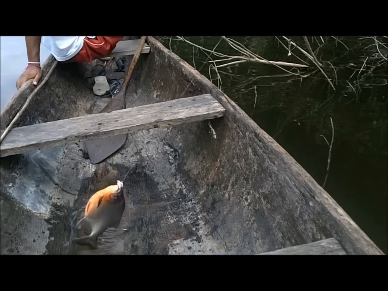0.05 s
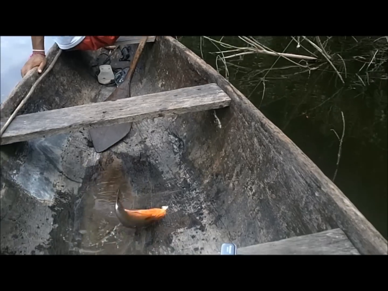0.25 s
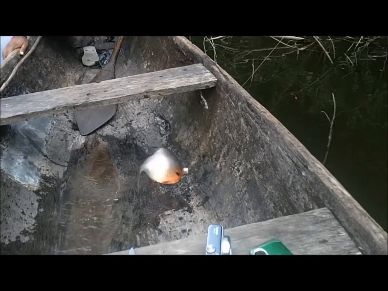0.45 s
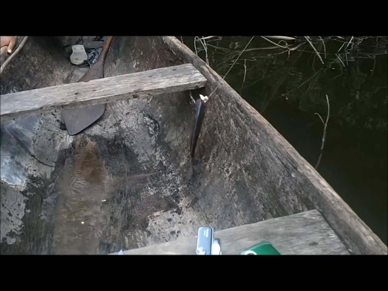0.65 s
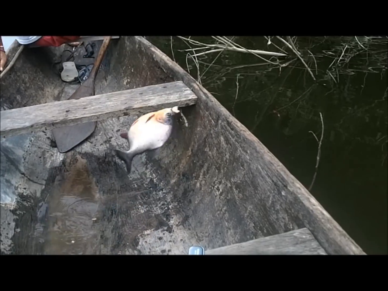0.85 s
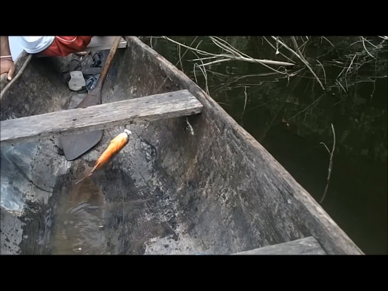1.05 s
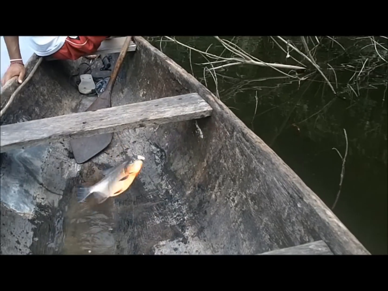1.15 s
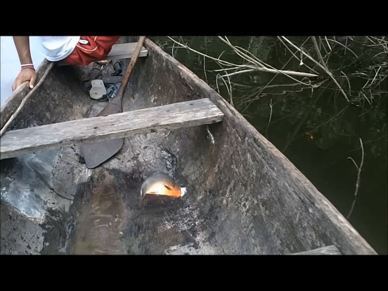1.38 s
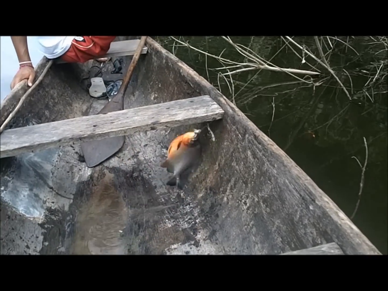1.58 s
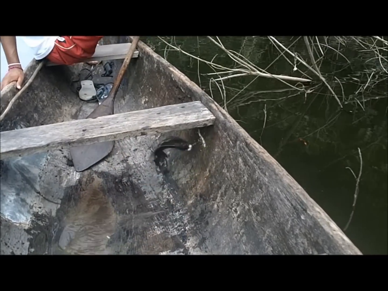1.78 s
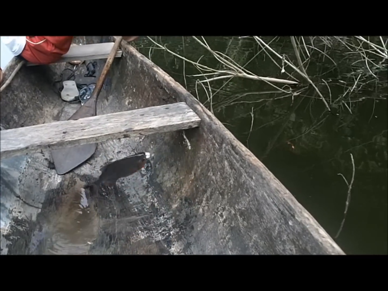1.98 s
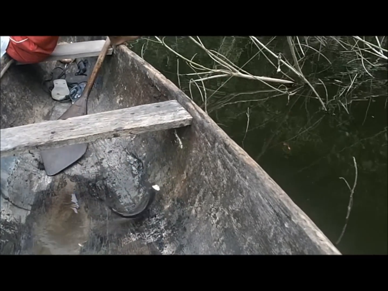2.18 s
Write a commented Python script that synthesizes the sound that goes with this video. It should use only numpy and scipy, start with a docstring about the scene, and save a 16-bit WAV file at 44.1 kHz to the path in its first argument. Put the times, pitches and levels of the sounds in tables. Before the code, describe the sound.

A fish thrashes in a wooden dugout. Quiet river air with faint insects and fast ticking, light touches from 0.2 s, then sharp wet slaps and plank knocks at about 0.5 s and again at 0.8-0.9 s, with low hull thuds. After a lull, a hard flurry hits near 1.45 s, followed by wet slithering and weaker knocks around 1.8-1.9 s, fading to faint scrapes by 2.2 s. Short hull echo.

```python
"""A caught fish thrashes in a wooden dugout canoe, in forest-river air with insect tones and a faint fast ticking.
From 0.2 s light contacts, then a volley to 0.9 s: noise bursts through resonances smack wet and knock the planks.
Damped sine modes boom under it as weight lands on the hull; a pause, then a second volley from 1.4 s.
From 1.5 s coloured noise slithers over the wet floor between the last slaps; a short hull echo follows the fish.
The microphone housing cuts deep notches into all of it."""
import sys
import numpy as np
from scipy import signal
from scipy.fft import rfft, irfft, next_fast_len
from scipy.io import wavfile
from scipy.ndimage import map_coordinates

SR = 44100
rng = np.random.default_rng(int(sys.argv[2]) if len(sys.argv) > 2 else 0)


def wav_out(sig):
    """Save sig, one row per channel (or a flat mono array), as 16-bit PCM at SR to the path in sys.argv[1]."""
    wavfile.write(sys.argv[1], SR, np.round(np.clip(np.atleast_2d(sig).T, -1, 1) * 32767).astype(np.int16))


N = 98166


def amp(db):
    """Amplitude factor of a level in dB."""
    return 10 ** (np.asarray(db) / 20)


def unit(x):
    """x scaled to rms 1."""
    return x / np.sqrt(np.mean(x ** 2) + 1e-20)


def curves(rows):
    """Columns after t/s, interpolated to one value per sample."""
    s, *cols = np.transpose(rows)
    return [np.interp(np.arange(N) / SR, s, c) for c in cols]


def wobble(rate_hz):
    """Smooth random curve: spline through rate_hz normal draws per second."""
    points = rng.standard_normal(int(N * rate_hz / SR) + 4)
    return map_coordinates(points, [np.arange(N) * rate_hz / SR])


def filtered(x, response):
    """x times a response of frequency, by FFT."""
    m = next_fast_len(len(x) + 8192)
    return irfft(rfft(x, m) * response(np.fft.rfftfreq(m, 1 / SR)), m)[:len(x)]


def colour(points):
    """Gain through (f/Hz, level/dB) points on a log frequency axis; -120 dB outside."""
    f, db = np.transpose(points)
    return lambda hz: amp(np.interp(np.log(hz + 1), np.log(f + 1), db, -120, -120))


def peak(centre_hz, width_hz):
    """Band-pass response of one resonance, gain 1 at its centre."""
    return lambda f: 1j * f * width_hz / (centre_hz ** 2 - f * f + 1j * f * width_hz)


def noise(response, count=N):
    """Coloured noise of rms 1."""
    return unit(filtered(rng.standard_normal(count), response))


# Tail and body contacts: t/s, wet level/dB before SLAP_TRIM_DB, knock level/dB re wet,
# knock f/Hz, knock width/Hz, rise constant/s, t60/s
CONTACTS = [(.226, -63, 2, 1770, 1186, .002, 0.03), (.268, -53, 2, 1640, 504, 0.0032, 0.031),
            (0.2808, -40.5, -6, 1610, 505, 0.0014, 0.022), (0.3842, -63, 8, 6300, 1500, 0.00081, 0.017),
            (0.425, -56.5, 11.5, 3000, 250, 0.0006, 0.026), (0.4678, -38, -3, 1160, 614, 0.00091, 0.022),
            (0.4735, -34.5, -3.5, 2020, 700, 0.00043, 0.058),
            (0.4901, -15.5, -2.5, 1730, 607, 0.0012, 0.0095), (0.496, -36.5, 1.5, 1770, 500, 0.0011, 0.062),
            (0.5237, -23, -6, 860, 920, 0.00014, 0.071), (0.5247, -26.5, 6.5, 1745, 297, 0.0027, 0.037),
            (0.5524, -28.5, 4, 4740, 905, 0.0039, 0.0097), (0.581, -39.5, -10.5, 4400, 600, 0.0006, 0.025),
            (0.6773, -46.5, -7, 970, 900, 0.00064, 0.029), (0.804, -41, -14, 1040, 1500, 0.00034, 0.016),
            (0.8122, -47, 2.5, 1690, 1500, 0.00089, 0.059), (.826, -30, 0.5, 706, 1620, 0.00058, 0.043),
            (0.839, -42.5, 7.5, 1900, 1610, 0.01, 0.11), (0.8589, -25, 0, 1420, 695, 0.00033, 0.038),
            (0.8656, -20, -5.5, 765, 1520, 0.0009, 0.015), (0.8722, -26.5, -4, 1060, 700, 0.00057, 0.015),
            (.892, -33, -4.5, 1930, 1530, 0.015, 0.036), (0.9056, -25, -7.5, 1530, 1560, 0.0013, 0.016),
            (1.4027, -47.5, -5, 593, 900, 0.00066, 0.034), (1.415, -37.5, -1, 880, 1540, 0.00077, 0.11),
            (1.425, -31.5, 0, 1366, 250, 0.0011, 0.055), (1.4398, -43, 1.5, 1260, 600, 0.0014, 0.072),
            (1.4564, -10.5, -6, 2000, 1200, 0.0013, 0.01), (1.4594, -19, -2, 775, 900, 0.00086, 0.028),
            (1.473, -16.5, 6, 1770, 830, 0.00038, 0.016), (1.4791, -27.5, 3.5, 860, 1520, 0.00035, 0.044),
            (1.4981, -36.5, -4, 624, 900, 0.00068, 0.053), (1.539, -46, -5, 5100, 600, 0.0023, 0.031),
            (1.685, -45.5, 6, 656, 1190, .006, 0.055), (1.798, -41, 4.5, 1390, 1020, 0.001, 0.064),
            (1.8175, -29, -2, 1340, 1250, 0.0012, 0.035), (1.835, -26.5, -6, 1530, 1220, 0.013, 0.03),
            (1.8443, -37, 3, 11700, 4000, .0005, 0.013), (1.8693, -36, 12, 1730, 600, 0.0016, 0.026),
            (1.870, -33.5, 14.5, 687, 260, 0.00061, 0.008), (1.872, -37, 0.5, 1310, 1200, 0.005, 0.07),
            (1.8965, -26.5, 1, 1750, 690, 0.00058, 0.016), (2.0312, -44, -6, 605, 1230, 0.00046, 0.089),
            (2.209, -34.5, -10.5, 1830, 600, 0.0087, 0.03)]
# Broad spectrum of a wet smack: f/Hz, level/dB
SMACK_SPECTRUM = [(1500, -46), (2700, -22), (4900, -10.5), (6000, -3.5), (8000, -13), (12000, -13),
                  (15200, -17.5), (15800, -68)]
# Broad response of the plank floor: f/Hz, level/dB
PLANK_SPECTRUM = [(250, 5), (600, 2.5), (2200, -5.5), (3500, -8)]
SLAP_TRIM_DB = -9.0
SMACK_HZ, SMACK_WIDTH_HZ, SMACK_BROAD_DB = 3724, 1610, -7
KNOCK_BODY_DB = -14.5  # broad plank body under its ring
CRACKLE_DB, CRACKLE_HOLD_SAMPLES = 6, 30
CRACK, CRACK_RISE_S = 0.6, 0.00043  # click re burst norm, at this rise; sharper is stronger


def slaps():
    """Each contact is a crackly noise burst plus click, filtered to a wet smack and a ringing plank knock."""
    out, n = np.zeros(N + SR), SR // 6
    t = np.arange(n) / SR
    for s, db, knock_db, knock_hz, knock_width_hz, rise_s, t60_s in CONTACTS:
        shape = (1 - np.exp(-t / rise_s)) ** 2 * amp(-60 * t / t60_s)
        steps = np.repeat(rng.standard_normal(n // CRACKLE_HOLD_SAMPLES + 1), CRACKLE_HOLD_SAMPLES)[:n]
        # rows: smack, knock (half the crackle)
        crackle = amp([[CRACKLE_DB], [CRACKLE_DB / 2]] * np.tanh(steps))
        burst = shape * crackle * rng.standard_normal((2, n))
        click_at = np.argmax(shape > shape.max() / 2)
        burst[:, click_at] += CRACK * np.linalg.norm(shape) * CRACK_RISE_S / rise_s

        smack_ring = peak(SMACK_HZ * rng.normal(1, .04), SMACK_WIDTH_HZ)
        smack_broad = colour(SMACK_SPECTRUM)
        wet = filtered(burst[0], lambda f: smack_ring(f) ** 2 + amp(SMACK_BROAD_DB) * smack_broad(f))

        knock_ring, plank = peak(knock_hz, knock_width_hz), colour(PLANK_SPECTRUM)
        knock = filtered(burst[1], lambda f: knock_ring(f) ** 2
                         + amp(KNOCK_BODY_DB) * plank(f) / plank(600))

        shape_rms = np.linalg.norm(shape) / shape.max() / np.sqrt(n)  # re envelope peak
        slap = unit(wet) + amp(knock_db) * unit(knock)
        out[round(s * SR):][:n] += amp(db + SLAP_TRIM_DB) * shape_rms * slap
    return out[:N]


# Weight landing on the hull: t/s, peak level/dB, favoured f/Hz
LANDINGS = [(0.222, -62.5, 154), (0.306, -48.5, 124), (0.471, -49, 250), (0.525, -38, 113),
            (0.533, -34.5, 266), (0.826, -44.5, 170), (0.863, -35, 173), (0.879, -39.5, 114),
            (1.07, -51, 200), (1.425, -42, 91), (1.455, -38, 259), (1.477, -31, 170), (1.49, -27, 285),
            (1.693, -33, 198), (1.742, -41.5, 182), (1.799, -33.5, 197), (1.869, -36, 212),
            (2.09, -50.5, 242), (2.125, -46, 288)]
# Hull modes: f/Hz, relative level/dB, t60/s
HULL_MODES = [(95.9, 1.5, 0.2), (155.6, -1.5, 0.12), (202.4, 5, 0.057), (253.5, -3, 0.11),
              (279.7, 1.5, 0.089), (453.4, 7.5, 0.092), (551.4, 11, 0.082), (655, 9.5, 0.087)]
FAVOUR_OCT, FAVOUR_DB = 0.52, 10  # a mode FAVOUR_OCT off the favoured pitch loses FAVOUR_DB
CONTACT_S = 0.0046  # onset time constant


def thuds():
    """A soft push rings the damped hull modes, those near the favoured pitch most."""
    out, t = np.zeros(N + SR), np.arange(SR // 2) / SR
    for s, db, favoured_hz in LANDINGS:
        ring = np.zeros(len(t))
        for hz, mode_db, t60_s in HULL_MODES:
            most = 1.5 if hz < favoured_hz else 2.5  # cap on the loss, x FAVOUR_DB
            loss_db = FAVOUR_DB * min((np.log2(hz / favoured_hz) / FAVOUR_OCT) ** 2, most)
            level_db = mode_db + rng.normal(0, 2.55) - loss_db
            detuned_hz = hz * rng.normal(1, 0.011)
            ring += amp(level_db - 60 * t / t60_s) * np.sin(2 * np.pi * detuned_hz * t)
        ring *= 1 - np.exp(-t / CONTACT_S)
        out[round(s * SR):][:len(t)] += amp(db) * ring / np.abs(ring).max()
    return out[:N]


# Slithering: t/s, hiss level/dB, scrape level/dB re hiss
SLITHER = [(1.5, -59, 0), (1.58, -74, 8), (1.608, -73, -2), (1.62, -55.5, -8.5), (1.7, -57, 1.5),
           (1.76, -65.5, 5), (1.9, -52, 1), (1.93, -67, 12), (2.01, -71, 4), (2.05, -64, 1),
           (2.12, -65.5, 9), (2.22, -63, 7)]


def slither():
    """Scales rub on wet wood: uneven smack-coloured hiss over a grainy plank-coloured scrape."""
    hiss_db, scrape_db = curves(SLITHER)
    fade_in = np.clip((np.arange(N) / SR - SLITHER[0][0]) / 0.038, 0, 1)
    ring, broad = peak(3950, 900), colour(SMACK_SPECTRUM)
    hiss = noise(lambda f: ring(f) ** 2 + amp(-11.5) * broad(f))
    hiss = unit(hiss * amp(3.0 * wobble(270)))
    scrape = unit(noise(colour(PLANK_SPECTRUM)) * amp(2.5 * wobble(90)))
    return fade_in * amp(hiss_db) * (hiss + amp(scrape_db) * scrape)


ECHO_DB, ECHO_T60_S = -10.5, 0.057


def hull_echo(fish):
    """Short diffuse echo inside the hull: convolution with decaying noise of unit energy."""
    t = np.arange(SR // 4) / SR
    tail = rng.standard_normal(len(t)) * amp(-60 * t / ECHO_T60_S)
    return amp(ECHO_DB) * signal.fftconvolve(fish, tail / np.linalg.norm(tail))[:N]


# Open air: t/s, upper wash level/dB, rumble level/dB
AIR_LEVELS = [(0, -76.5, -70), (.46, -74, -66), (.475, -66.5, -58), (.95, -62, -61), (1.3, -67, -64.5),
              (1.6, -64, -58), (2.226, -63, -60.5)]
# Wash spectrum: f/Hz, relative level/dB
WASH_SPECTRUM = [(250, -14), (400, 9.5), (900, 5.5), (1500, 1), (2400, -1), (4600, -1.5), (5600, -14),
                 (7300, -21), (8700, -12.5), (12000, -15), (15200, -12.5), (15500, -53)]
# Water rumble spectrum: f/Hz, relative level/dB
RUMBLE_SPECTRUM = [(10, 3.5), (20, -5.5), (100, -15.5), (250, -14.5), (450, -32.5)]
# Steady insect bands: f/Hz, width/Hz, level/dB re wash
INSECT_BANDS = [(1510, 4, -15.5), (6150, 570, -12)]
TICK_DB = -31  # re wash


def air():
    """Coloured-noise wash and water rumble, with resonant insect bands and ticking riding on the wash."""
    wash_db, rumble_db = curves(AIR_LEVELS)
    upper = noise(colour(WASH_SPECTRUM)) + amp(TICK_DB) * ticking()
    for hz, width_hz, db in INSECT_BANDS:
        band = peak(hz, width_hz)
        upper += amp(db + 1.56 * wobble(7.06)) * noise(lambda f: band(f) ** 2)
    upper *= amp(wash_db + 0.8 * wobble(40))
    rumble = amp(rumble_db + 3 * wobble(7.97)) * noise(colour(RUMBLE_SPECTRUM))
    return upper + rumble


TICK_RATE_HZ, TICK_FIRST_S, TICK_HZ, TICK_WIDTH_HZ = 60, .005, 7150, 1500


def ticking():
    """Regular treble clicks of uneven level ring one resonance; rms 1."""
    clicks = np.zeros(N)
    at_s = np.arange(TICK_FIRST_S, N / SR - TICK_FIRST_S, 1 / TICK_RATE_HZ)
    clicks[(at_s * SR).astype(int)] = amp(2 * rng.standard_normal(len(at_s)))
    return unit(filtered(clicks, lambda f: peak(TICK_HZ, TICK_WIDTH_HZ)(f) ** 2))


# Thin insect tones: start t/s, end t/s, f/Hz, level/dB at mid-swell
INSECT_TONES = [(-.3, 0.18, 3600, -82), (1.1, 1.7, 8610, -81.5)]


def singers():
    """Narrow-band noise makes thin unsteady tones that swell and fade on a half sine."""
    t = np.arange(N) / SR
    out = np.zeros(N)
    for start_s, end_s, hz, db in INSECT_TONES:
        swell = np.sin(np.pi * np.clip((t - start_s) / (end_s - start_s), 0, 1))
        out += amp(db) * swell * noise(lambda f: peak(hz, hz / 80)(f) ** 2)
    return out


def scene():
    """The fish and its echo, the hull thuds, the air and insects."""
    fish = slaps() + slither()
    return (fish + hull_echo(fish) + thuds() + air() + singers())[None]


# Microphone housing notches: f/Hz, width/Hz, depth (1 = full cut)
HOUSING_NOTCHES = [(2730, 640, .97), (5500, 450, .95), (7950, 900, .93), (10930, 600, .92)]
TOP_HZ = 16400


def record(dry):
    """Resonances subtracted as housing notches, then a sharp band limit."""
    def notches(f):
        """Product of all notch responses."""
        return np.prod([1 - depth * peak(hz, width_hz)(f) for hz, width_hz, depth in HOUSING_NOTCHES], axis=0)

    return filtered(filtered(dry[0], notches), lambda hz: hz < TOP_HZ)[None]


dry = scene()
out = record(dry)
wav_out(out)
```